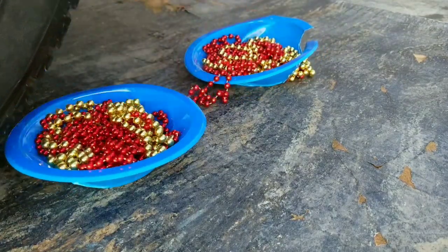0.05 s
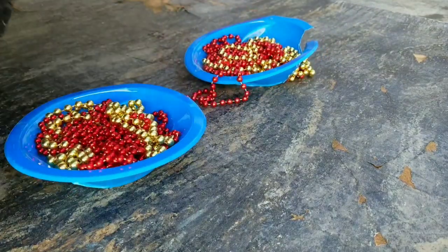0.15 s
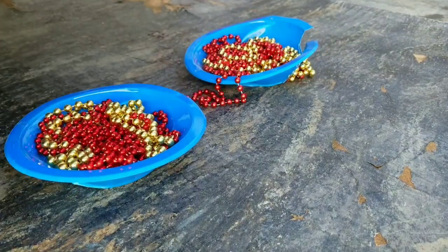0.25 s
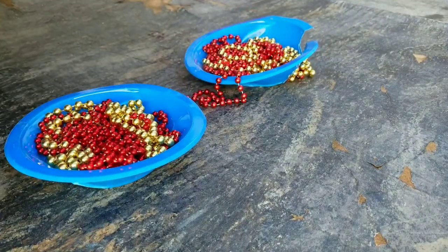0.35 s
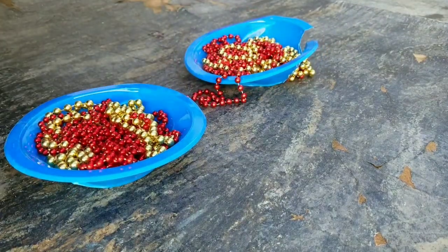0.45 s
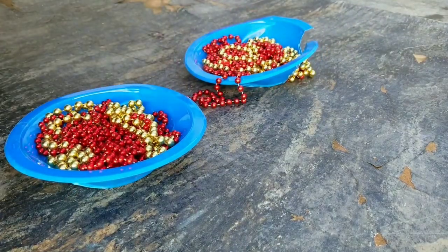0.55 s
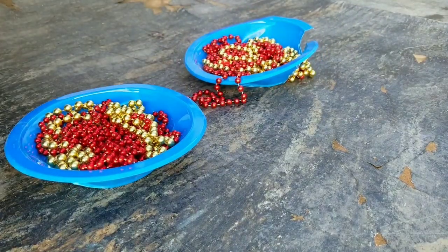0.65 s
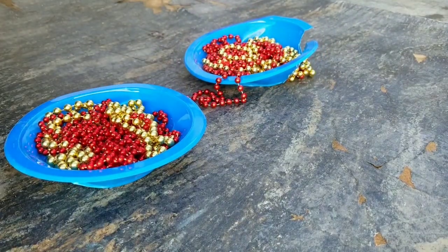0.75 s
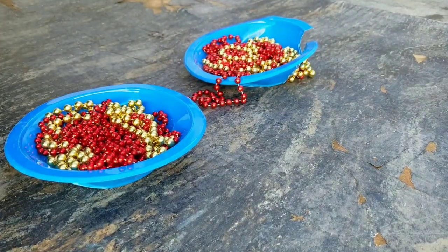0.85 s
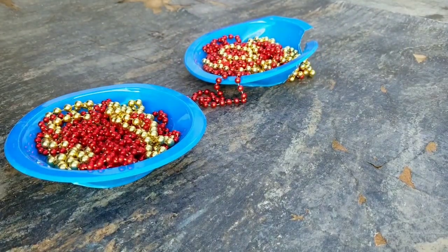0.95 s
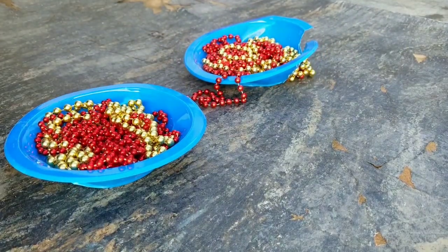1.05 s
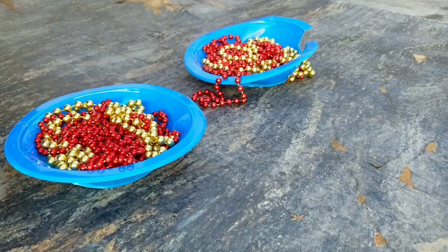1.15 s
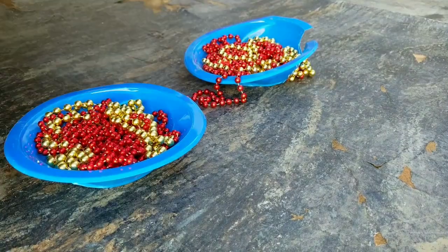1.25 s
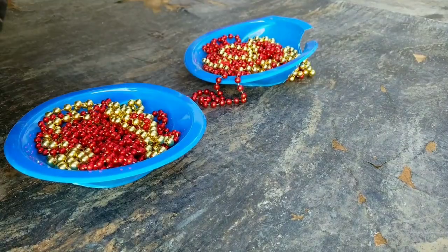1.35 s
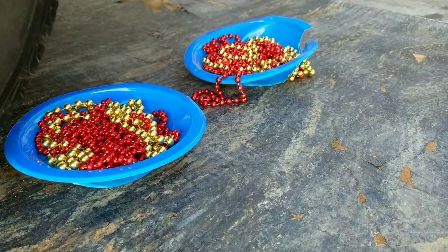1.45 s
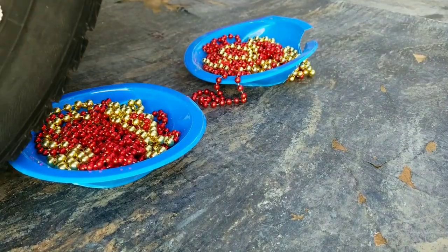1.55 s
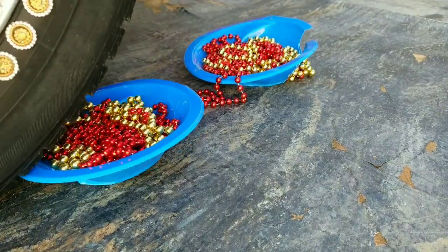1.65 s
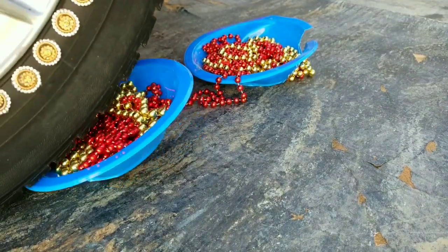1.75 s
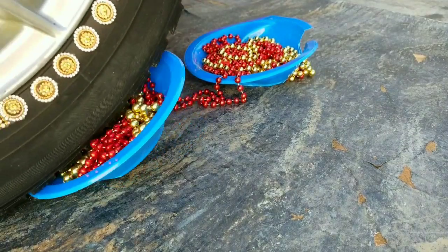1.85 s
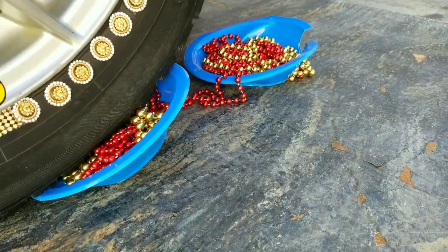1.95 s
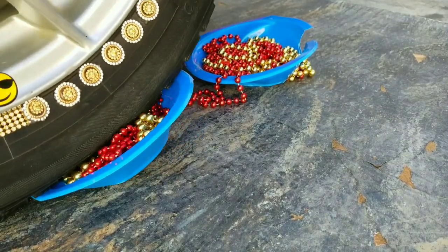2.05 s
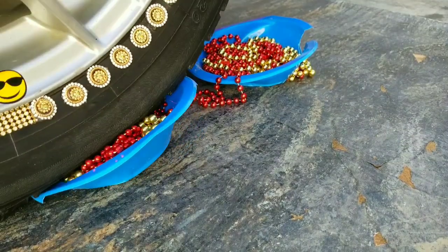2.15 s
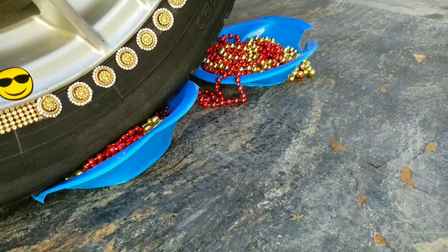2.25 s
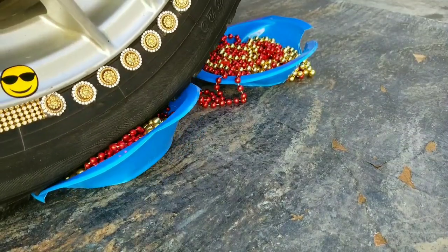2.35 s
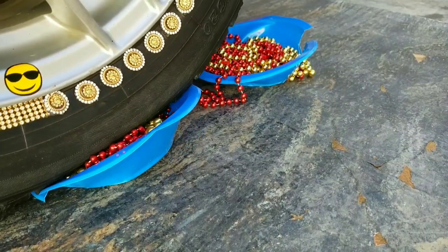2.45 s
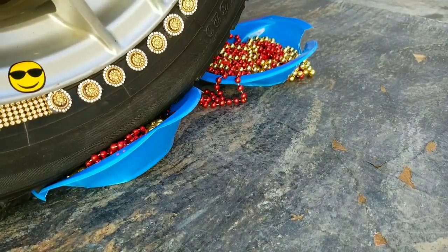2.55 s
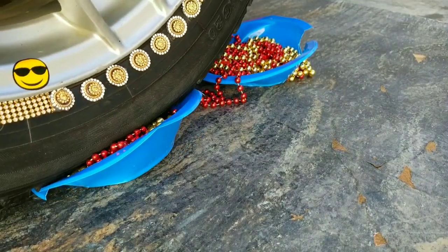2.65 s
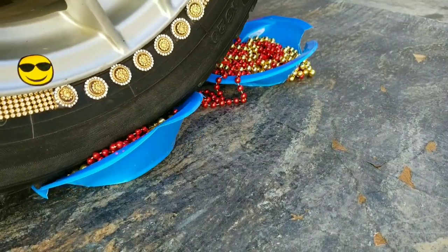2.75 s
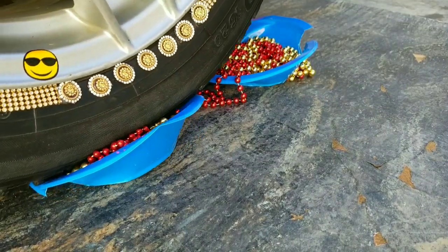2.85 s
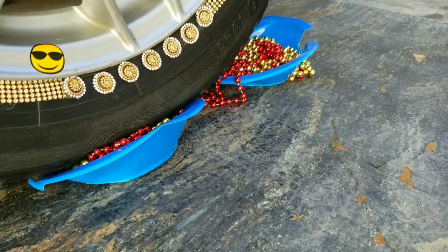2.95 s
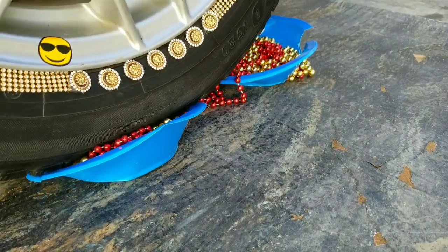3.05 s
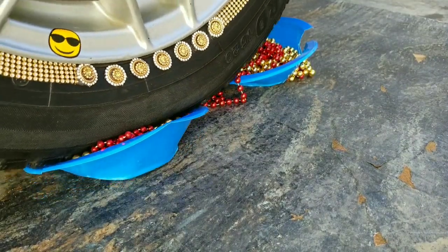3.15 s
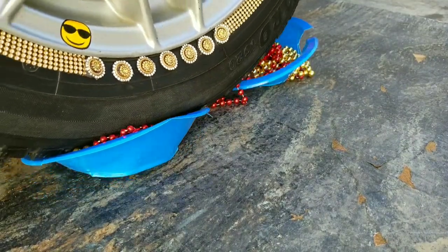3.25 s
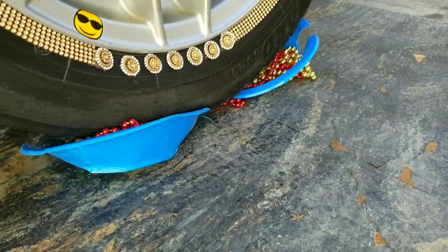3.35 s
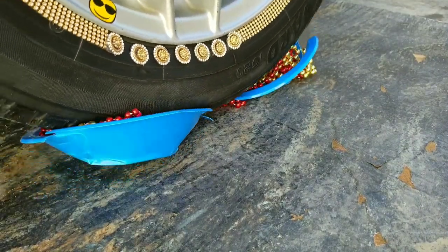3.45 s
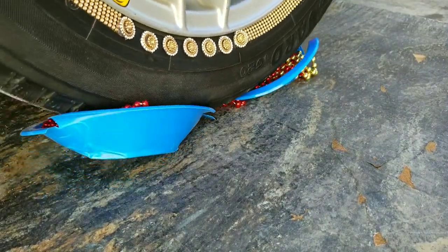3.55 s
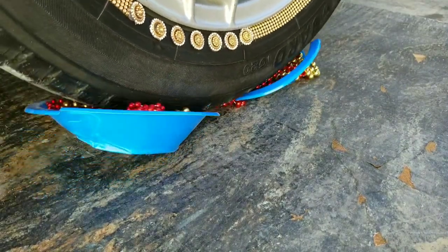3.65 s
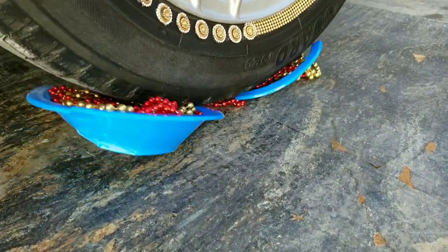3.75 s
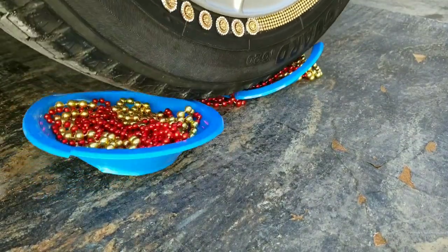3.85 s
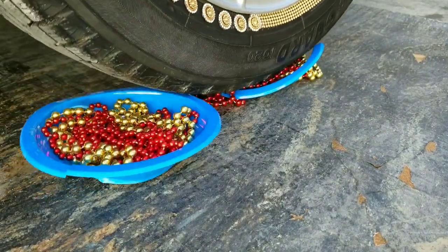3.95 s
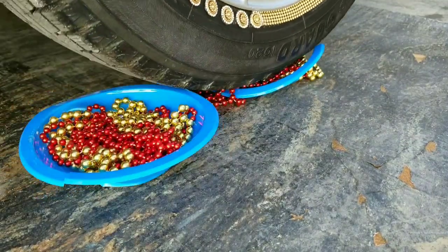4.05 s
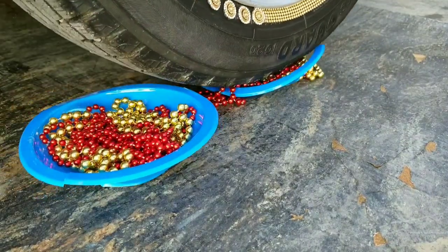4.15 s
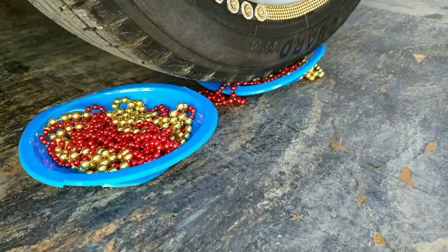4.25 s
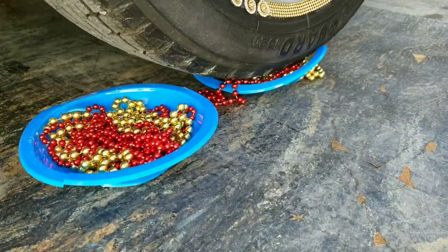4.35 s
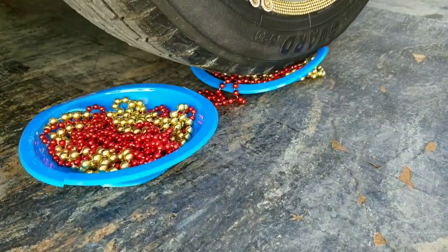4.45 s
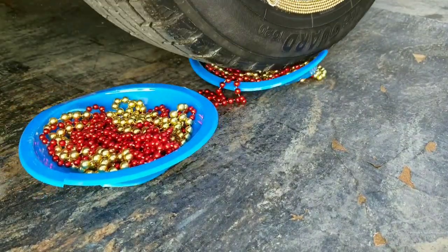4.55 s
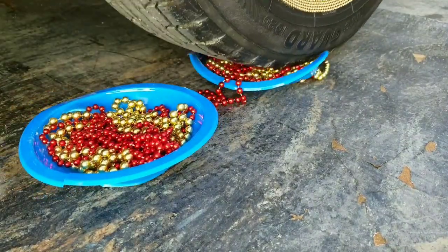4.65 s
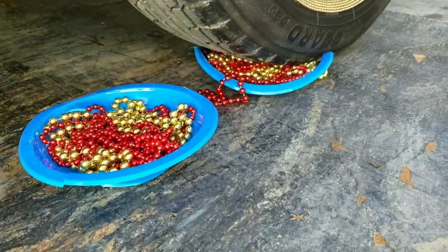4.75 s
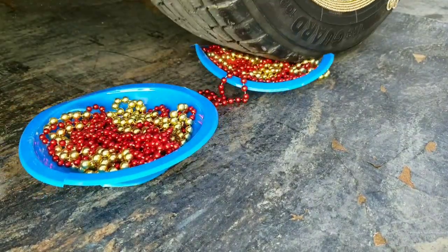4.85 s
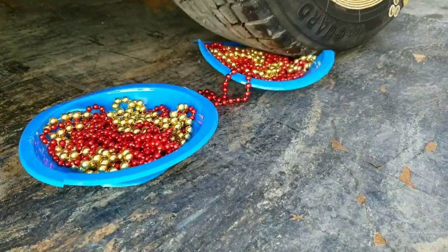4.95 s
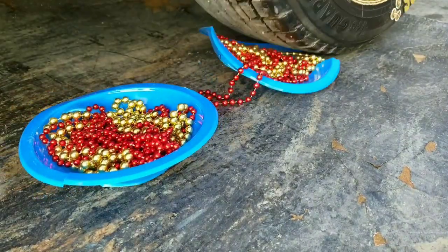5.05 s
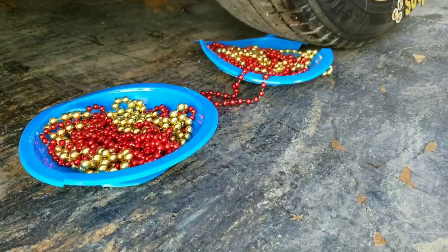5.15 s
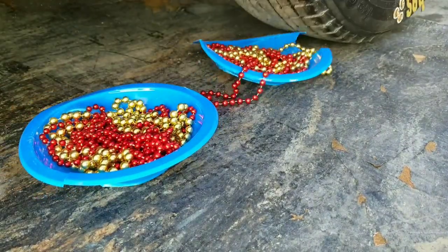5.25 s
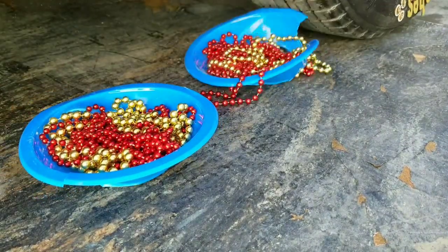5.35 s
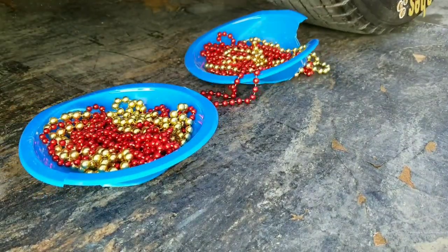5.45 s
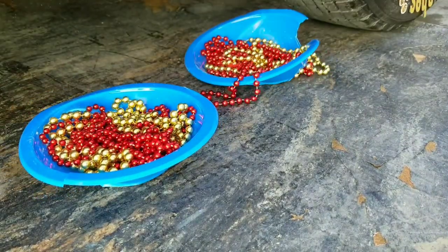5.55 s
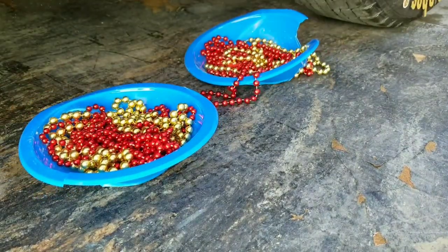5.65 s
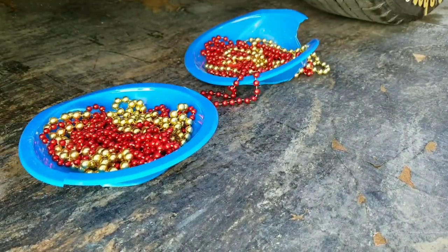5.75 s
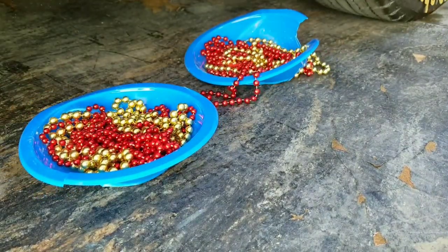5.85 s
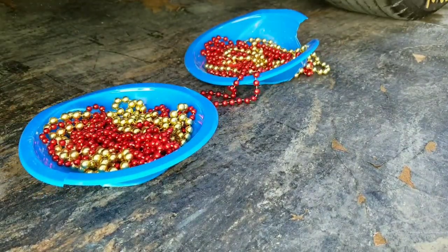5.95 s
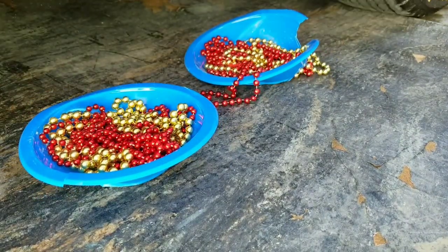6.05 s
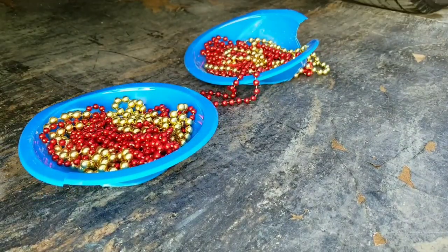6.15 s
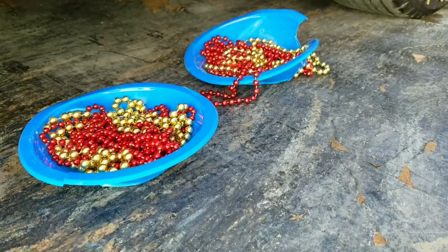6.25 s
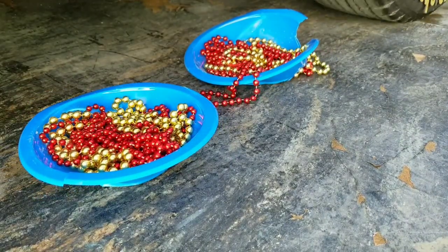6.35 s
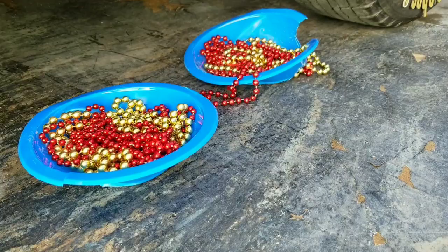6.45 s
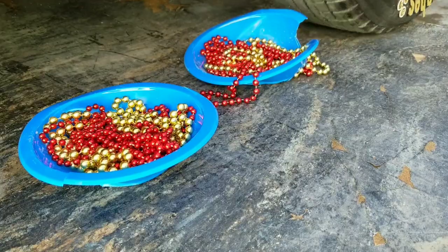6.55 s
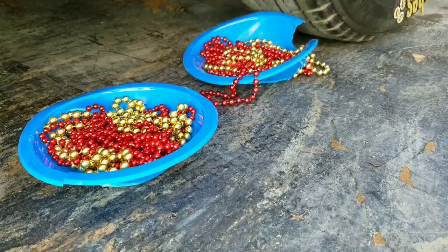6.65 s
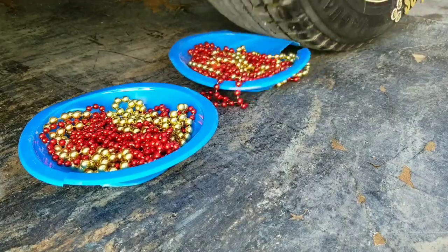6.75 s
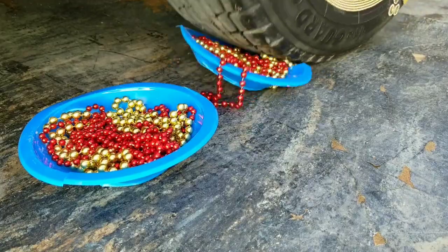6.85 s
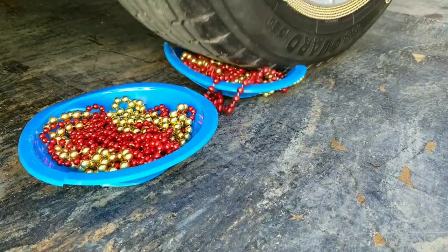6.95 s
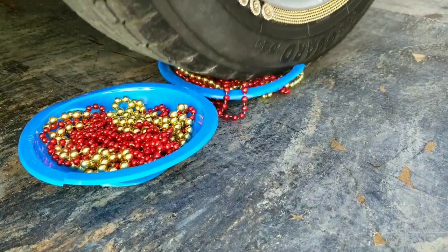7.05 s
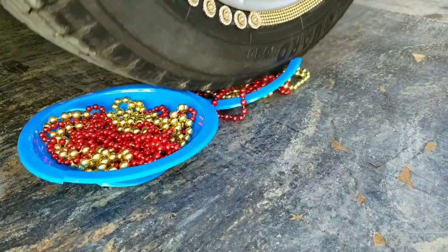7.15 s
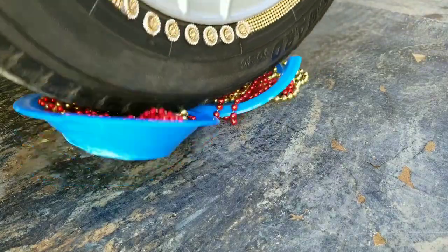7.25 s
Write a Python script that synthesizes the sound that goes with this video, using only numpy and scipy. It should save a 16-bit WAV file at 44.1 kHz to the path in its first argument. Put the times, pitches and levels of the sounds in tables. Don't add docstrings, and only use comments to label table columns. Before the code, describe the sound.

Brittle plastic snaps and hollow pops burst out as a slow tyre crushes bead-filled bowls, pauses, then rolls back with fresh crackling.

```python
import sys
import numpy as np
from scipy import signal
from scipy.fft import rfft, irfft
from scipy.io import wavfile
from scipy.ndimage import uniform_filter1d, map_coordinates

SR = 44100
rng = np.random.default_rng(int(sys.argv[2]) if len(sys.argv) > 2 else 0)


def log_audio(samples):
    frames = np.atleast_2d(samples).T
    limited = np.clip(frames, -1, 1)
    pcm = np.round(limited * 32767).astype(np.int16)
    wavfile.write(sys.argv[1], SR, pcm)


def gain_from_db(level_db):
    decades = np.asarray(level_db, float) / 20
    return 10 ** decades


N = 321477

# time in seconds, peak in dB, bead brightness in dB,
# bowl knock in dB, bowl pitch in Hz.
PITCHED_SNAPS = [(1.9982, -14.5, 0, -13.5, 1130), (2.0668, -12.5, 2, -7, 830), (2.145, -6.5, -5, -2, 803),
                 (2.164, -8.5, -7, -10.5, 740), (2.2062, -9, -0.5, -12, 1290), (2.244, -18, -1, 7, 800),
                 (2.439, -9.5, -4, -4.5, 793), (2.755, -11, -2, 9, 823), (3.0408, -19.5, 0, 0.5, 750),
                 (3.187, -12, -5.5, 2, 976), (3.3183, -22, 6.5, 8, 727), (3.3843, -16.5, 2.5, 10.5, 750),
                 (3.6242, -8.5, -10, -4, 790), (3.8471, -8.5, -13, -0.5, 1345), (4.1017, -9.5, -9.5, -1.5, 806),
                 (4.3806, -7.5, -10.5, -4, 1580), (4.5041, -1.5, -6, -8.5, 945), (4.55, -9, -3.5, -6.5, 950),
                 (4.6804, -8.5, -11.5, -1.5, 910), (4.7238, -8, -9.5, -1.5, 817),
                 (4.7424, -7.5, -4, -22.5, 818), (4.7656, -8, -11, -6.5, 885), (4.908, -16, -3, -5.5, 962),
                 (7.2662, -17.5, -0.5, -1.5, 1003)]
# time in seconds, peak in dB, bead brightness in dB,
# bowl knock in dB.
MOUNT_CRACKS = [(1.9846, -13, -3, -9), (2.0244, -14, 2.5, -11), (2.0367, -21, 3, -4.5),
                (2.0527, -23.5, -4.5, 4), (2.0905, -25.5, -1.5, -2.5), (2.188, -15.5, -8, -17.5),
                (2.2796, -33.5, 4.5, 0.5), (2.3541, -21, 5, -9.5), (2.387, -24, 2.5, -0.5),
                (2.5126, -36.5, 6.5, 1.5), (2.572, -22.5, -2, -8), (2.6166, -21, -6.5, -7.5),
                (2.632, -28, 3, -4.5), (2.6782, -26, -6, -2), (2.134, -26, -7, 2.5)]
FOLD_CRACKS = [(2.7818, -15.5, 4, -9), (2.8523, -25.5, -5, -2.5), (2.903, -20, -4, -5),
               (2.954, -25, -2.5, -4.5), (2.9821, -27, -1, -0.5), (3.056, -31.5, -7.5, 7.5),
               (3.105, -39.5, 2, -7), (3.1347, -25.5, 1, 0.5), (3.162, -26, -3.5, -5),
               (3.252, -38.5, -0.5, -2), (3.2733, -30.5, 2, -1), (3.4011, -27.5, 7.5, -1),
               (3.416, -20, -19.5, -13), (3.4452, -22.5, -0.5, -13.5), (3.468, -23, -3, -4.5),
               (3.5145, -16.5, 3, 0), (3.5393, -18, 2.5, 0), (3.5777, -20.5, -0.5, -2),
               (3.6, -21.5, -8, 0.5), (3.6353, -18, -2, -4.5), (3.6594, -24, -2.5, -13.5),
               (3.6817, -23, -10, -8.5), (3.7232, -15, -4.5, -11.5), (3.7572, -29.5, 0.5, -29)]
FAR_CRACKS = [(3.932, -38.5, 2, -0.5), (3.9561, -31, -19, -24), (4.0437, -39.5, -12.5, 5.5),
              (4.1961, -19, -9.5, -4), (4.211, -21.5, -4, -15.5), (4.3577, -21, -5, -15.5),
              (4.4741, -25, 2.5, 1), (4.6289, -17.5, -7, -3), (4.8137, -20, 5, -2.5),
              (4.8262, -13, -6, -5.5), (4.8405, -15, 0.5, -3), (4.9233, -20.5, -4, -2.5),
              (4.9638, -22.5, -7, -4), (4.9811, -25, 5, -21.5), (4.669, -25, 5.5, -11),
              (4.5548, -16, -9.5, 1)]
BACK_CRACKS = [(6.9841, -17, -3, -1), (7.0152, -21.5, -4, 0.5), (7.0234, -22, 0, 4.5),
               (7.0297, -21, -11, 4), (7.0402, -23, -14.5, -6.5), (7.0527, -18.5, -3, -8.5),
               (7.0676, -14.5, -8, -3), (7.0796, -16.5, -2.5, -9.5), (7.0918, -23, 2.5, 1.5),
               (7.1127, -22, -2, 2), (7.1193, -21.5, -3.5, 0.5), (7.1306, -12, -9, -8),
               (7.1535, -24.5, 4, 0.5), (7.1607, -25, -2, -1), (7.182, -25.5, -2, 5),
               (7.2073, -16, -2.5, -3.5), (7.2232, -24.5, -2, 0), (7.2464, -16.5, -4.5, -4.5)]
# time in seconds, peak in dB, bead brightness in dB.
LOOSE_TAPS = [(0.0072, -11, -10), (0.014, -13.5, -11.5), (0.058, -22, -15.5), (0.0892, -18, -11.5),
              (0.097, -19, -9), (0.164, -24, -26), (0.2134, -25.5, -16), (0.2695, -37, -19.5),
              (0.4704, -40, -12), (0.5473, -49.5, 11), (0.588, -51.5, 13.5), (0.6015, -58.5, 22),
              (1.4724, -38.5, -11.5), (1.614, -39.5, -7), (1.715, -38, 6), (5.7596, -61, -1),
              (5.9743, -49.5, -5), (6.173, -72, 14.5), (6.4693, -59.5, 19)]
RIM_GRAZES = [(1.9031, -28.5, 3), (1.9241, -25, 2), (1.9346, -14.5, 0), (1.9543, -20, 2.5),
              (1.9657, -15, -0.5), (6.713, -26, 3.5), (6.7227, -26.5, -7.5), (6.8409, -20.5, -5.5),
              (6.9335, -30.5, 10), (6.9525, -31.5, 0), (6.9605, -29, 2), (6.973, -21.5, 6)]
# time in seconds, peak in dB, bowl pitch in Hz.
REBOUNDS = [
    (5.2432, -47, 950),
    (5.2858, -32.5, 1140),
    (5.3892, -39, 2110),
    (5.411, -31.5, 1840),
    (5.4408, -30.5, 1980),
    (5.4645, -30.5, 1910),
    (5.505, -30.5, 1790),
    (5.542, -29, 1630),
    (5.55, -31.5, 1790),
    (5.5641, -29, 1660),
]
# time in seconds, bowl pitch in Hz.
BENT_PITCH = [(2.6166, 703), (2.8517, 751), (2.903, 649), (2.9824, 1040), (3.0559, 751), (3.1624, 896),
              (3.5776, 754), (3.6, 1010), (4.4741, 1060), (4.8405, 1000), (4.9233, 1060), (7.0918, 724),
              (7.1535, 748), (7.2073, 1010), (7.2232, 1060), (7.2464, 727)]
# time in seconds, sizzle change in dB.
TYRE_SHADE = [(0, -12.5), (1.5, -10), (2, -2), (3.7, -4), (4.2, -5), (4.9, -3.5), (5.4, -11.5), (6.95, -8),
              (7.1, -4)]
# time in seconds, knock T60 in seconds.
TREAD_GRIP = [(1.9, 0.018), (2.3, 0.022), (2.8, 0.0098), (3.15, 0.011), (3.4, 0.014), (3.8, 0.0081),
              (4.4, 0.0089), (4.7, 0.016), (5, 0.013), (5.2, 0.015), (5.7, 0.027), (7, 0.012)]
# time
# in seconds, peak in dB, brightness in dB.
BEAD_TICKS = [(1.8971, -15.5, -1), (1.924, -6.5, -2), (2.0373, -6.5, 4.5), (2.1181, -13.5, 0),
              (2.2564, -19, 2.5), (2.3196, -22.5, 4.5), (2.3254, -24.5, 2), (2.3366, -12, -2),
              (2.3684, -18, -3), (2.4723, -24.5, 6.5), (2.4804, -22.5, 4), (2.5274, -34.5, -0.5),
              (2.6045, -21, 8.5), (2.7134, -42, 1), (2.8524, -15.5, 0.5), (3.0754, -30.5, -1.5),
              (3.1083, -28, 2), (3.1273, -19.5, -0.5), (3.2264, -36, 1.5), (3.2484, -34, 2),
              (3.253, -23, 1.5), (3.4326, -15, -5), (3.478, -11.5, -6), (3.4874, -17.5, -6.5),
              (3.5484, -15, -2.5), (3.6174, -14.5, 2), (3.6805, -22, -2.5), (3.7923, -21, -2.5),
              (4.0068, -37.5, 1), (4.0214, -45, -5), (4.0687, -32.5, 1), (4.2896, -42, 9),
              (4.3311, -43, -8), (4.5644, -18.5, -1), (4.5854, -32.5, -1.5), (4.6324, -12, 0),
              (4.7184, -9, -2.5), (4.7874, -21.5, -0.5), (4.8204, -10.5, 4.5), (4.9134, -12.5, 9.5),
              (4.9314, -20.5, 4), (4.9514, -20, -2.5), (4.9816, -9.5, -7.5), (7.0274, -12.5, 2.5),
              (7.1944, -18, 4), (7.2834, -21.5, -3.5),
              (2.139, -13, 3), (2.229, -22, -2.5), (2.4482, -15, 5), (2.8954, -44, 3), (3.2938, -27, 2),
              (3.3123, -21, 0), (3.33, -21.5, 7), (3.71, -27.5, -12), (4.458, -32, -1.5),
              (7.008, -27.5, -7), (0.232, -48, -4), (0.255, -46.5, -6),
              (0.1052, -22, -6), (0.137, -48, -7), (0.1489, -39, -18), (0.7238, -53, 8),
                 (0.771, -46, -9), (0.9355, -50.5, -1), (0.9419, -42, 0.5), (0.9657, -47, 0),
                 (1.3676, -51.5, 3), (1.5149, -48.5, 0.5), (1.5257, -43.5, 4), (1.5476, -38, -3),
                 (1.7372, -25, 5.5), (5.0342, -37, 0), (5.083, -37.5, -9), (5.1496, -38, 3),
                 (5.3058, -26, -3), (5.3311, -33, -7), (5.638, -46, -4), (5.6614, -49, 0), (5.717, -52, 6),
                 (5.7324, -51, 5), (5.7558, -46, 10), (5.78, -52.5, 4), (6.3894, -41, 0.5),
                 (6.3954, -42.5, 5.5), (6.4104, -41, 5.5), (6.5256, -38.5, 5), (6.559, -43.5, 0),
                 (6.6752, -38, -2)]
# time in seconds, peak in dB.
RIM_CHATTER = [
    (6.9356, -16),
    (6.9404, -19),
    (6.9504, -17),
    (6.9616, -14.5),
    (6.971, -14),
    (6.9754, -15),
    (6.9804, -19),
]
# start in seconds, hold in seconds, rattle in dB, sizzle over it in dB, bowl over it in dB.
BEAD_RUSHES = [(0, 0.084, -35, -10, -5), (1.108, 0.0436, -63, 6.5, -10), (1.51, 0.35, -65, -3, 8),
               (1.683, 0.037, -40.5, -3, -8), (1.74, 0.086, -50, -2, -6), (1.896, 0.042, -25.5, -9.5, -9),
               (1.944, 0.072, -21.5, -7.5, -12.5), (2.13, 0.059, -26.5, -15, -8),
               (2.212, 0.027, -26, -4, -6), (3.422, 0.23, -36.5, -13, -1), (4.766, 0.014, -32, -5.5, -5),
               (4.816, 0.19, -42.5, -7, -4.5), (5.138, 0.0069, -43.5, -13.5, -28),
               (5.375, 0.099, -44.5, -17, -22), (6.368, 0.31, -62.5, -3, -8.5),
               (6.732, 0.12, -32.5, -7.5, -10), (6.907, 0.1, -25.5, -6.5, -12),
               (6.995, 0.14, -28, -2.5, -9), (7.129, 0.19, -34, -7, -31)]
# time in seconds, level in dB.
BEAD_CREEP = [(.1, -46.5), (.35, -62), (1.08, -68), (1.33, -82), (1.5, -55.5), (2.3, -43.5), (2.73, -56.5),
              (2.95, -46), (3.1, -54), (3.37, -44), (3.7, -45), (4, -51), (4.33, -57), (4.6, -38.5),
              (5.04, -52), (5.55, -49), (5.64, -66.5), (6.34, -72)]
# start in seconds, end in seconds.
TYRE_ON_BOWL = [
    (1.9, 5.02),
    (6.95, 7.3),
]
# time in seconds, left lag in samples, left over right in dB.
WHEEL_BEARING = [
    (0, 1.5, 0.5),
    (1.5, -6, 4),
    (3, -9.5, 1.5),
    (4.5, 2.5, 0),
    (6.5, -0.5, 2),
]
# time in seconds, level in dB.
ROLLING_EFFORT = [(0, -84.5), (0.4, -87), (1.2, -67), (1.4, -62), (1.7, -48.5), (1.86, -63), (2, -44.5),
                  (2.4, -55), (3.2, -75), (3.6, -60), (4, -75), (4.75, -58.5), (5.05, -69.5), (5.7, -75.5),
                  (6.1, -63.5), (6.5, -61), (6.9, -57), (7.29, -43.5)]
# time in seconds, level in dB.
TREAD_THUDS = [
    (0, -66),
    (1.998, -25.5),
    (3.6, -55.5),
    (7.002, -47),
]
# time in seconds, level in dB, fading in dB per second.
WHEEL_RINGS = [
    (0, -57, 60),
    (2.44, -60, 20),
    (2.755, -51, 12),
    (3.385, -59, 30),
    (3.624, -54, 25),
    (3.847, -54, 25),
    (4.101, -53, 20),
    (4.5, -55, 60),
]
# start in seconds, end in seconds, pitch in Hz, level in dB, roughness in radians.
ROUGH_TONES = [(5.46, 5.6, 1690, -53, .9), (7.205, 7.25, 2350, -33, 1.4), (5.65, 6.1, 1520, -80, .8),
               (.32, .46, 530, -69, 1.2), (1.5, 1.64, 590, -65, 1), (5.62, 6.18, 1995, -72, .9),
               (.2, .46, 1020, -68, 1), (.2, .5, 2690, -73, 1.2), (6.45, 6.72, 560, -67, 1),
               (5.85, 6.12, 870, -75, 1.3), (6.28, 6.7, 1965, -81, .7), (5.6, 6.6, 10008, -80.5, .3),
               (6.5, 6.9, 1452, -64, .8)]
# start in seconds, end in seconds, pitch in Hz, level in dB, roughness in radians.
WHEEL_DRONES = [
    (1.05, 1.42, 80, -63, .6),
    (1.0, 1.5, 104, -66, .5),
    (1.38, 1.88, 128, -56, .7),
    (5.95, 6.9, 40, -63, .5),
    (6.15, 6.75, 76, -62, .5),
    (6.05, 6.5, 102, -65, .5),
]
# frequency in Hz, level in dB.
PLASTIC_COLOUR = [(600, -26), (1200, -4.5), (2400, -4.5), (3400, -7), (6000, -26)]
BEAD_COLOUR = [(1500, -39.5), (3500, -4.5), (5000, 1), (7200, -6.5), (10000, -26.5)]
SIZZLE_COLOUR = [(5000, -14.5), (8500, -6), (11000, -1), (14700, -5), (15500, -13.5), (16200, -40.5)]
CAVITY_COLOUR = [(200, -32.5), (400, -7), (830, 3.5), (1100, -1), (1500, -31.5), (2400, -44.5)]
RUMBLE_COLOUR = [(15, -14.5), (40, -20.5), (75, -9), (100, -9), (140, -4.5), (250, -43.5)]
GROAN_COLOUR = [(70, -19.5), (110, -6.5), (170, -3.5), (250, -1.5), (390, -5.5), (700, -45.5)]
AIR_COLOUR = [(180, -13), (300, -4), (600, -8.5), (900, -14), (1300, -35), (3000, -21), (15300, -29),
              (16500, -54.5)]

BOWL_HZ, BOWL_SCATTER = 827, 0.03


def bowls():
    (plastic, bead, sizzle, after), knock, jolt = snaps()
    plastic_tick, bead_tick, sizzle_tick = ticks()
    rattle, fizz, hollow = stirring()
    clumps = gain_from_db(1.5 * wobble(1500))
    plastic = (plastic + plastic_tick) * clumps + gain_from_db(-2.5 + 0.79 * wobble(22)) * rattle
    bead = (bead + bead_tick) * clumps + gain_from_db(-4.5 + 2.1 * wobble(28)) * rattle
    sizzle = (sizzle + sizzle_tick) * clumps + fizz
    grains = coloured(plastic * ports(0.14), PLASTIC_COLOUR)
    grains = grains + coloured(bead * ports(0.11), BEAD_COLOUR)
    grains = grains + coloured(sizzle * ports(0.017) * gain_from_db([[1.2], [-1.2]]), SIZZLE_COLOUR)
    grains = grains + coloured((after + gain_from_db(-5.0) * hollow) * ports(0.51), CAVITY_COLOUR)
    sound = knock + crumpled(grains, depth_db=3)
    low_cut = signal.butter(2, 146, 'high', fs=SR, output='sos')
    sound = jolt + rim_chatter() + signal.sosfilt(low_cut, sound)
    pan_db = curves(WHEEL_BEARING)[1]
    return sound * gain_from_db([pan_db / 2, -pan_db / 2])


def snaps():
    s, db, bead_db, sizzle_db, knock_db, hz = fractures()
    t = instants(.08)
    chance = rng.standard_normal((len(s), 2))
    pressed = (s > 1.85) * (s < 5) + (s > 6.9)
    after_db = db + knock_db - 16.0 - 4 * np.abs(np.log2(hz / BOWL_HZ))
    after = gain_from_db(after_db) * dying(t, 0.0012, 0.099)
    crackles = crackle_bursts(t, db, bead_db, sizzle_db, chance[:, :1])
    knock = gain_from_db(db + knock_db + 6.0) * cavity_ring(t, s, hz, pressed, chance[:, 1:])
    knock = knock + wall_kick(t, db, bead_db, pressed, chance[:, 1:])
    jolt = pressed * gain_from_db(db + knock_db - 36.5) * np.sin(2 * np.pi * 59 * t) * dying(t, 0.004, 0.022)
    s = s[:, 0] + .0001
    return [lay(s, e) for e in (*crackles, after)], lay(s, knock), lay(s, jolt)


def fractures():
    rows = [tuple(row) for row in PITCHED_SNAPS]
    for table in (MOUNT_CRACKS, FOLD_CRACKS, FAR_CRACKS, BACK_CRACKS):
        rows += [(*row, 0) for row in table]
    rows += [(*row, -25.5, 0) for row in LOOSE_TAPS]
    rows += [(*row, -14.5, 0) for row in RIM_GRAZES]
    rows += [(s, db, -10, -11, hz) for s, db, hz in REBOUNDS]
    s, db, bright_db, knock_db, hz = np.transpose(sorted(rows))[:, :, None]
    usual_hz = BOWL_HZ * np.exp(BOWL_SCATTER * rng.standard_normal(s.shape))
    for bent_s, bent_hz in BENT_PITCH:
        usual_hz = np.where(np.abs(s - bent_s) < .005, bent_hz, usual_hz)
    bead_db = bright_db + 6.5
    sizzle_db = bead_db + curves(TYRE_SHADE, s)[0]
    return s, db - 3.5, bead_db, sizzle_db, knock_db + 6, np.where(hz > 0, hz, usual_hz)


def crackle_bursts(t, db, bead_db, sizzle_db, chance):
    burst = dying(t, .0006, .0062 * np.exp(.2 * chance))
    jerks = wobble(500)[:t.size * len(db) // 4].repeat(4).reshape(len(db), -1)
    shaken = gain_from_db(.2 * (db + 20)) * gain_from_db(4.5 * jerks)
    plastic = gain_from_db(db + 5.5) * (burst + gain_from_db(-16.5) * shaken * dying(t, 0.0014, 0.074))
    bead = gain_from_db(db + bead_db + 8.5) * (burst ** 1.21 + gain_from_db(-21.5) * shaken * dying(t, 0.0013, 0.06))
    sizzle = gain_from_db(db + sizzle_db + 12.5) * (burst ** 1.34 + gain_from_db(-25) * shaken * dying(t, 0.0016, 0.055))
    return plastic, bead, sizzle


def cavity_ring(t, s, hz, pressed, phase):
    t60 = np.maximum(curves(TREAD_GRIP, s)[0], .004)
    ring = np.sin(2 * np.pi * hz * t) * dying(t, 0.00093, t60)
    ring = ring + gain_from_db(-8.0) * np.sin(2 * np.pi * hz * 1.087 * t + phase) * dying(t, 0.00096, 1.4 * t60)
    return ring + pressed * gain_from_db(-7.5) * np.sin(2 * np.pi * hz * .45 * t) * dying(t, 0.0019, 0.013)


def wall_kick(t, db, bead_db, pressed, chance):
    push = pressed * gain_from_db(db + 5.0 - 0.38 * bead_db) * np.sin(2 * np.pi * 300 * t) * dying(t, 0.0015, 0.0083)
    click_hz, click_t60 = 3493 * np.exp(0.27 * chance), 0.0021
    click = gain_from_db(db + .5 * bead_db + 0.5 - 60 * t / click_t60) * np.sin(2 * np.pi * click_hz * t)
    return push + click + shards(db + .5 * bead_db, t)


def shards(db, t):
    low_hz, high_hz = 1600, 13000
    pick = rng.random((len(db), 12))
    hz = low_hz * (high_hz / low_hz) ** pick[:, :6]
    modes = sum(gain_from_db(-12 * pick[:, 6 + k, None]) * np.sin(2 * np.pi * hz[:, k, None] * t) for k in range(6))
    return gain_from_db(db - 3) * modes * dying(t, .0004, .009)


def ticks():
    s, db, bright_db = np.transpose(BEAD_TICKS)[:, :, None]
    tick = dying(instants(.023), 0.00085, 0.01)
    levels = (db - 11.5 - bright_db, db - 5, db - 4.5 + bright_db)
    return [lay(s[:, 0], gain_from_db(level) * tick) for level in levels]


def rim_chatter():
    s, db = np.transpose(RIM_CHATTER)[:, :, None]
    t = instants(.023)
    return lay(s[:, 0], gain_from_db(db + 4) * np.sin(2 * np.pi * 3850 * t) * dying(t, 0.0004, .016))


def stirring():
    creep = gain_from_db(curves(BEAD_CREEP)[0] + np.array([[0], [-10], [-3.5]]))
    rush_power = 0
    for s, hold, db, sizzle_db, bowl_db in BEAD_RUSHES:
        gains = gain_from_db(db + np.array([[0], [sizzle_db], [bowl_db]]))
        rush_power = rush_power + gains ** 2 * swell(s, hold, 701, 327) ** 2
    crackle = grit(140, spread_db=4, t60=.005, bed_db=-3) ** (.4 + .6 * load())
    shake = grit(600, spread_db=3.5, t60=.004, bed_db=1) * gain_from_db(1.2 * wobble(30))
    return np.sqrt((creep * crackle) ** 2 + rush_power * shake ** 2)


def grit(rate, spread_db, t60, bed_db):
    hits = (rng.random(N) < rate / SR) * gain_from_db(spread_db * np.minimum(rng.exponential(size=N), 3))
    decay = dying(instants(.02), 0.0005, t60)
    energy = unit(np.sqrt(np.abs(signal.oaconvolve(hits ** 2, decay ** 2)[:N])))
    return unit(np.sqrt(energy ** 2 + gain_from_db(bed_db) ** 2))


def crumpled(x, depth_db):
    z = signal.stft(x, nperseg=256)[2]
    field = uniform_filter1d(rng.standard_normal(z.shape[1:]), size=4, axis=0)
    field = uniform_filter1d(field, size=7, axis=1)
    field = field - field.mean(axis=0)
    gain_db = depth_db * unit(field) - depth_db ** 2 * np.log(10) / 20
    return signal.istft(z * gain_from_db(gain_db), nperseg=256)[1][:, :N]


def load():
    return np.minimum(sum(swell(start, end - start, 150, 60) for start, end in TYRE_ON_BOWL), 1)


def car():
    sound = tyre() + ringing_wheel() + drive_hum() + rough_tones() + drones()
    return sound * gain_from_db([[1.5], [-1.5]])


def tyre():
    rumble_db, = curves(ROLLING_EFFORT)
    free_db, loaded_db = -4, 4.5
    groan = gain_from_db(rumble_db + free_db + load() * (loaded_db - free_db))
    groan = groan + sum(gain_from_db(db) * swell(s, 0, 301.5, 201) for s, db in TREAD_THUDS)
    rumble = gain_from_db(rumble_db + 1.8 * wobble(7.5)) * coloured(ports(0.96), RUMBLE_COLOUR, size=8192)
    return rumble + groan * coloured(ports(1.0), GROAN_COLOUR, size=4096)


def ringing_wheel():
    level = sum(gain_from_db(db) * swell(s, 0, 900, fall_db) for s, db, fall_db in WHEEL_RINGS)
    return level * gain_from_db(3 * wobble(25)) * np.sin(2 * np.pi * 233 * instants() + .6 * wobble(14))


def drive_hum():
    effort_db, = curves(ROLLING_EFFORT)
    follow_db = .25 * (np.minimum(effort_db, -55) - effort_db.mean())
    return gain_from_db(-68.5 + follow_db + 2.6 * wobble(40)) * np.sin(2 * np.pi * 315 * instants() + 0.68 * wobble(4.9))


def rough_tones():
    t, waver, sound = instants(), wobble(120), 0
    for start, end, hz, db, rough in ROUGH_TONES:
        level = gain_from_db(db + 2 * rough * waver) * np.abs(arch(start, end)) ** .6
        sound = sound + level * np.sin(2 * np.pi * hz * t + rough * waver)
    return sound


def drones():
    t, sway, sound = instants(), wobble(14), 0
    for start, end, hz, db, rough in WHEEL_DRONES:
        level = gain_from_db(db + 3 * sway) * arch(start, end)
        sound = sound + level * np.sin(2 * np.pi * hz * t + 3 * rough * sway)
    return sound


def air():
    effort_db, = curves(ROLLING_EFFORT)
    strain_db = np.minimum(curves(BEAD_CREEP)[0], -55) + 62
    level_db = -63 + 0.2 * (effort_db - effort_db.mean()) + 0.17 * strain_db
    return gain_from_db(level_db) * coloured(ports(0.12), AIR_COLOUR)


def instants(seconds=N / SR):
    return np.arange(int(round(seconds * SR, 6))) / SR


def curves(rows, s=None):
    t, *cols = np.transpose(rows)
    return [np.interp(instants() if s is None else s, t, c) for c in cols]


def unit(x):
    return x / np.sqrt(np.mean(x ** 2) + 1e-20)


def wobble(rate):
    knots = rng.standard_normal(int(N * rate / SR) + 4)
    return map_coordinates(knots, [np.arange(N) * rate / SR], order=1)


def dying(t, attack, t60):
    return (1 - np.exp(-(t / attack) ** 2)) * gain_from_db(-60 * t / t60)


def swell(start, hold, rise_db, fall_db):
    t = instants()
    return gain_from_db(-rise_db * np.maximum(start - t, 0) - fall_db * np.maximum(t - start - hold, 0))


def arch(start, end):
    return np.sin(np.pi * np.clip((instants() - start) / (end - start), 0, 1))


def coloured(x, spectrum, size=1024):
    hz, db = np.transpose(spectrum)
    log_hz = np.log(np.fft.rfftfreq(size, 1 / SR) + 1)
    gain = unit(gain_from_db(np.interp(log_hz, np.log(hz + 1), db)))
    cep = irfft(np.log(gain + 1e-4))
    cep[1:size // 2] *= 2
    cep[size // 2 + 1:] = 0
    return signal.oaconvolve(x, irfft(np.exp(rfft(cep)))[None], axes=1)[:, :N]


def ports(alike):
    turn = np.arccos(np.clip(alike, 0, 1)) / 2
    a, b = rng.standard_normal((2, N))
    return np.array([np.cos(turn) * a + np.sin(turn) * b, np.cos(turn) * a - np.sin(turn) * b])


def lay(s, waves):
    out = []
    for side in (.5, -.5):
        first = np.round(s * SR + side * curves(WHEEL_BEARING, s)[0]).astype(int)
        at = first[:, None] + np.arange(waves.shape[1])
        out.append(np.bincount(np.clip(at, 0, N).ravel(), waves.ravel(), N + 1)[:N])
    return np.array(out)


def scene():
    return bowls() + car() + air()


def roll_off(x):
    return signal.sosfilt(signal.butter(12, 15900, fs=SR, output="sos"), x)


def record(dry):
    held = dry / (1 + np.abs(dry) ** 8) ** (1 / 8)
    return roll_off(held)


dry = scene()
out = record(dry)
log_audio(out)
```